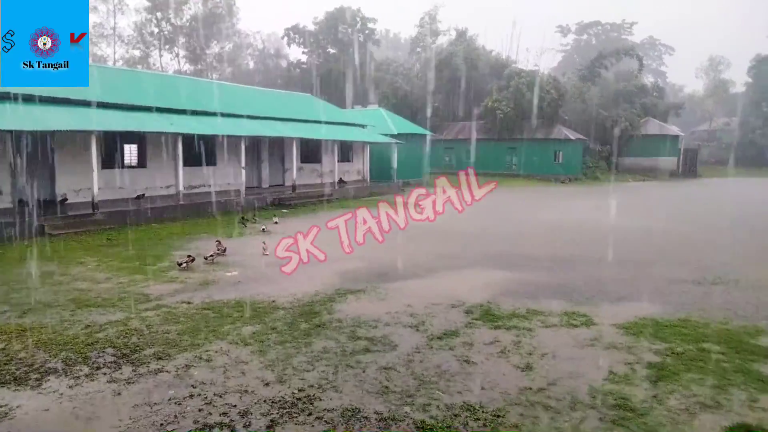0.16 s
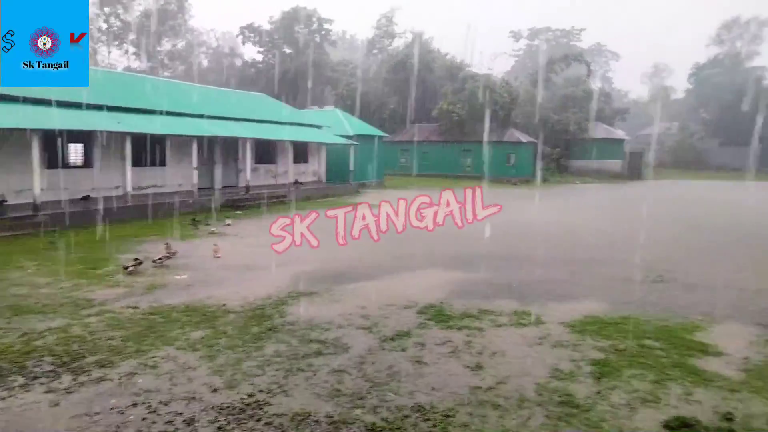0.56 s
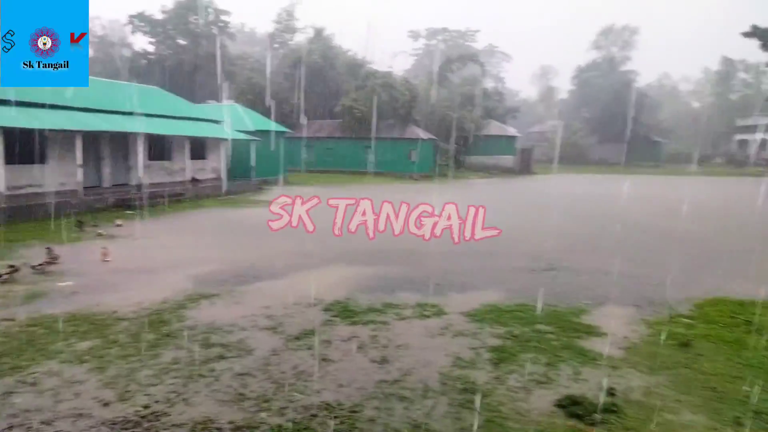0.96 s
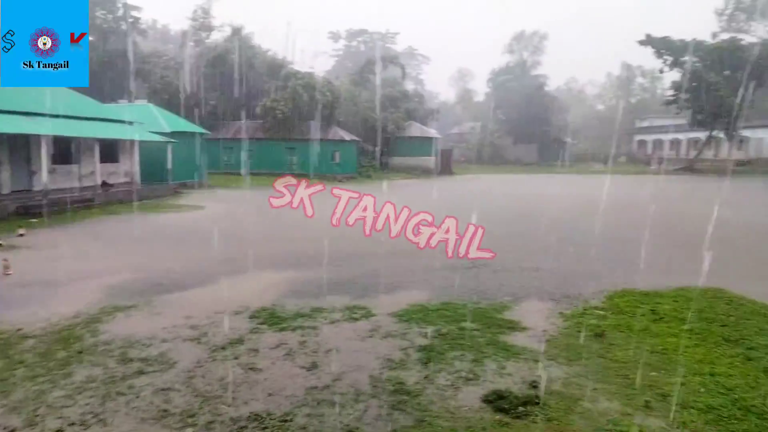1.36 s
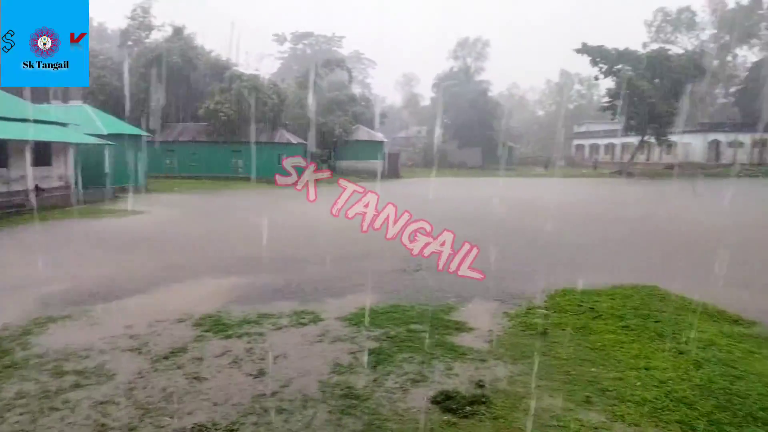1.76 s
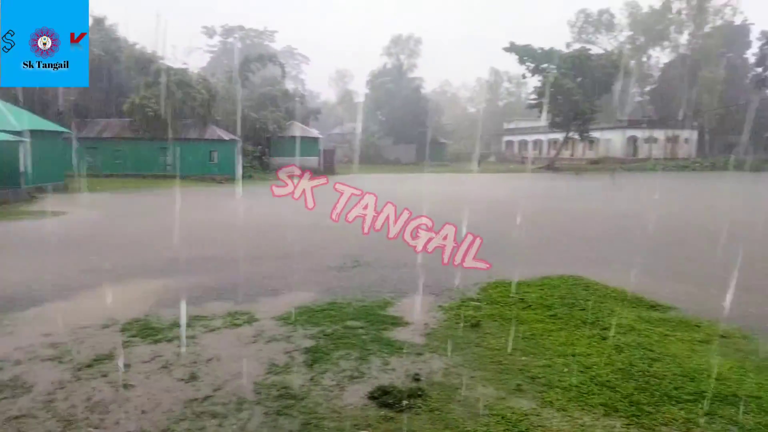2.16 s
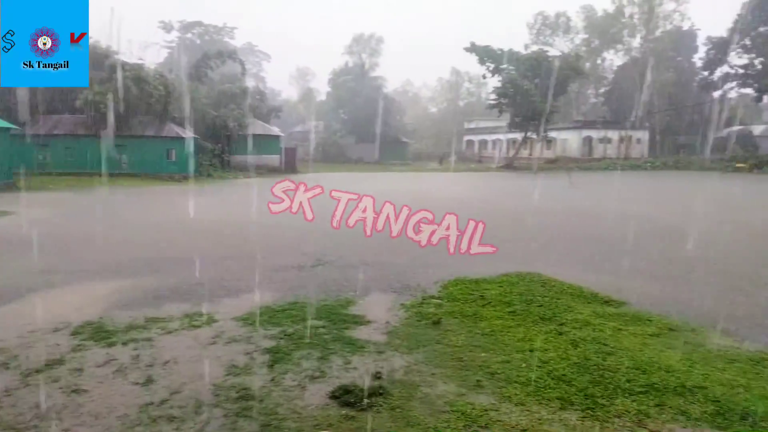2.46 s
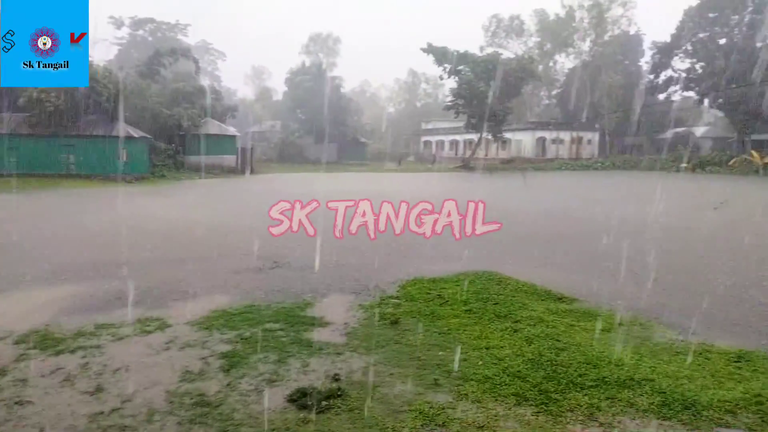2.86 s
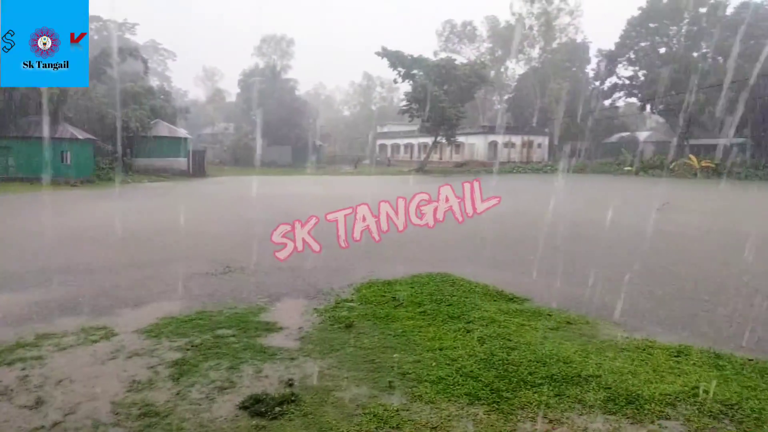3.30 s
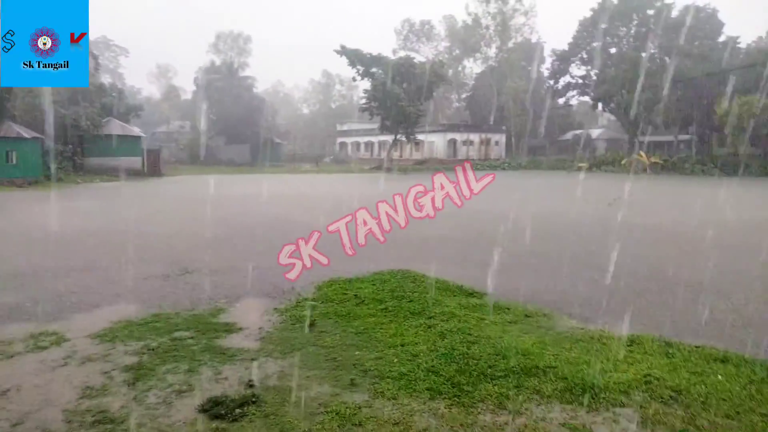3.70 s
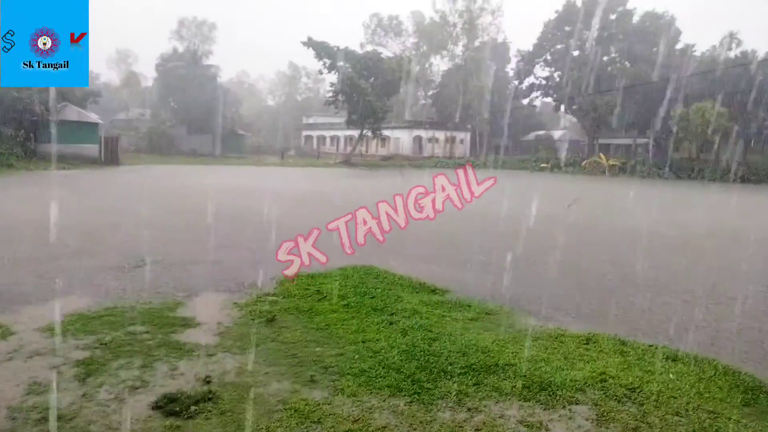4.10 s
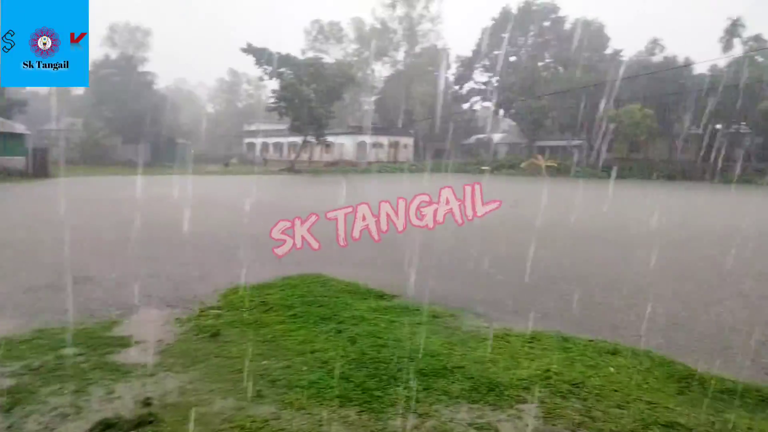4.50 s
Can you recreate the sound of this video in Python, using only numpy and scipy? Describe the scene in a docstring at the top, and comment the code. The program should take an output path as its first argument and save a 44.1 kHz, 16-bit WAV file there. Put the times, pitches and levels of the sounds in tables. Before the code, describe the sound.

Heavy, even rain pours onto a flooded field, a dense wash with bright sizzle, dipping briefly in level near the end.

```python
"""A dense, even downpour on a flooded field: a broad wash, a bright sizzle and a low drumming, the same in both channels.
Far drops merge into shaped noise; near drops are noise puffs and tiny ringing bubbles scattered at random.
Roofs and soaked ground drum below as low noise. Resonances of the microphone port, strongest near 9 kHz,
brighten the spray. Late on, the level dips briefly, then swings gently up and down."""
import sys
import numpy as np
from scipy import signal
from scipy.fft import rfft, irfft, next_fast_len
from scipy.io import wavfile
from scipy.ndimage import uniform_filter1d, map_coordinates

SR = 44100
rng = np.random.default_rng(int(sys.argv[2]) if len(sys.argv) > 2 else 0)


def store_wav(level_fs):
    """Save 16-bit WAV to argv[1]."""
    pcm = np.round(np.clip(np.atleast_2d(level_fs), -1, 1) * 32767)
    wavfile.write(sys.argv[1], SR, pcm.T.astype(np.int16))


N = 204753  # length in samples

# Strength of the rain, which drives every layer. Each row: time in seconds, strength in dB.
RAIN_STRENGTH = [(0.0, -21), (0.1, -19.5), (0.23, -21), (2.68, -21.5), (2.87, -20.5), (3.98, -20),
                 (4.03, -20.5)]
# Tone of the far rain and standing water. Each row: frequency in Hz, relative level in dB.
WASH_SPECTRUM = [(100, -36), (300, -11), (480, -6), (560, -0.8), (700, -2.1), (880, -0.65), (1400, -0.4),
                 (1750, -2.3), (2300, 0), (2850, 0), (3400, -4), (4800, -11.5), (8000, -22), (16000, -40)]
# Tone of the fine spray. Each row: frequency in Hz, relative level in dB.
SPRAY_SPECTRUM = [(1000, -18), (3000, -1.5), (4200, -1), (5800, -2), (8000, 0), (10000, 0), (12000, 0.1),
                  (15500, -0.96)]
# Tone of the roofs and ground. Each row: frequency in Hz, relative level in dB.
DRUMMING_SPECTRUM = [(20, -16), (45, -7), (72, -6), (90, 0.5), (125, -2.5), (195, -1), (240, -4), (330, -4),
                     (480, -10.5), (900, -27.5)]
# Resonances of the microphone port. Each row: centre in Hz, width in Hz, lift in dB (overlapping lifts add).
PORT_RESONANCES = [(6980, 1300, 4.5), (8730, 1880, 8.5), (9850, 2070, 4.5)]

USUAL_DB = -20.5  # strength of the even downpour
# Base level at the usual strength, and dB gained per dB of strength.
WASH_DB, WASH_GROWS = -25.5, 0.72
SPRAY_DB, SPRAY_GROWS = -22.5, 0.92  # swings wider, so harder rain is brighter
# The level slides down, holds, and snaps back.
DIP_START_S, DIP_END_S, DIP_DB = 4.128, 4.223, -7.9
DIP_FALL_S, DIP_RETURN_S = 0.01, 0.0018
# Then one swing, up and down: midpoint, time from there to each extreme, size of each extreme.
SWING_AT_S, SWING_WIDTH_S, SWING_DB = 4.368, 0.036, 1.3
TOP_HZ = 15750  # upper band limit


def flooded_field(wash_db):
    """Far drops merge into a wash; nearer ones plink and plop as bubbles and splashes in standing water."""
    far = rush(WASH_SPECTRUM, patchy_db=0.5)
    plinks = bubbles(count=4000, pitch_hz=2402, octaves=0.5, cycles=20, rise=0.044, spread_db=2.5)
    plinks = coloured(plinks, WASH_SPECTRUM)
    plops = coloured(splats(count=5000, life_s=0.00082, spread_db=1.5), WASH_SPECTRUM)
    water = amp(-2.5) * far + amp(-7.0) * plinks + amp(-8.0) * plops
    return amp(wash_db + 0.078 * wobble(12)) * water


def spray(spray_db):
    """Fine hiss off the whole surface, ticks on grass and mud close by, and the fizz of the tiniest bubbles."""
    hiss = rush(SPRAY_SPECTRUM, patchy_db=0.43)
    ticks = coloured(splats(count=9000, life_s=0.00059, spread_db=1.5), SPRAY_SPECTRUM)
    fizz = unit(bubbles(count=2500, pitch_hz=8946, octaves=0.12, cycles=52, rise=0.015, spread_db=2.5))
    sizzle = amp(-5.5) * hiss + amp(-9.0) * ticks + amp(-18.5) * fizz
    return amp(spray_db + 0.34 * wobble(16)) * sizzle


def bubbles(count, pitch_hz, octaves, cycles, rise, spread_db):
    """Trapped air rings, fading over a set number of cycles, and climbs in pitch as it nears the surface."""
    t = np.arange(SR // 40) / SR
    hz = pitch_hz * 2 ** (octaves * rng.standard_normal((count, 1)))
    hz = np.clip(hz, 500, 13000)
    age = hz * t / cycles  # 1 when the ring has faded to 1/e
    # the pitch climbs by the fraction "rise" as the ring ages
    phase = 2 * np.pi * cycles * (age + rise * (age - 1 + np.exp(-age)))
    return scatter(np.sin(phase) * np.exp(-age), spread_db)


def splats(count, life_s, spread_db):
    """Each drop bursts on the surface in a short, fading puff of noise."""
    t = np.arange(SR // 200) / SR
    puffs = rng.standard_normal((count, len(t))) * np.exp(-t / life_s)
    return scatter(puffs, spread_db)


def scatter(grains, spread_db):
    """Drop each row at a random moment; a few land close and loud, most are faint."""
    count, length = grains.shape
    nearness = np.minimum(rng.exponential(size=count), 5)
    starts = rng.integers(0, N, count)
    index = starts[:, None] + np.arange(length)
    levelled = grains * amp(spread_db * nearness)[:, None]
    return np.bincount(index.ravel(), levelled.ravel(), N)[:N]


def rush(spectrum, patchy_db):
    """Countless merged drops: noise whose gain varies in smooth random patches of time and frequency."""
    bins = signal.stft(rng.standard_normal(N), nperseg=512)[2]
    patches = uniform_filter1d(rng.standard_normal(bins.shape), size=9, axis=0)  # across frequency
    patches = uniform_filter1d(patches, size=16, axis=1)  # across time
    noise = signal.istft(bins * amp(patchy_db * unit(patches)), nperseg=512)[1][:N]
    return coloured(noise, spectrum)


def drumming(wash_db):
    """Roofs and soaked ground give a low roll of noise that follows the wash."""
    return amp(wash_db - 16.5) * rush(DRUMMING_SPECTRUM, patchy_db=1)


def amp(db):
    """Decibels to gain."""
    return 10 ** (np.asarray(db) / 20)


def unit(x):
    """Scale to rms 1."""
    return x / np.sqrt(np.mean(x ** 2) + 1e-20)


def curves(rows):
    """One value per sample for each column after the time."""
    seconds, *columns = np.transpose(rows)
    return [np.interp(np.arange(N) / SR, seconds, column) for column in columns]


def wobble(rate):
    """A smooth random curve, rate knots a second."""
    knots = rng.standard_normal(int(N * rate / SR) + 4)
    return map_coordinates(knots, [np.arange(N) * rate / SR])


def filtered(x, response):
    """Shape x with a gain for each frequency, padded so the tail does not wrap round."""
    size = next_fast_len(N + SR // 2)
    hz = np.fft.rfftfreq(size, 1 / SR)
    return irfft(rfft(x, size) * response(hz), size)[:N]


def coloured(x, spectrum):
    """Give x a tone drawn in dB over a log frequency axis, at rms 1."""
    points_hz, db = np.transpose(spectrum)

    def response(hz):
        return amp(np.interp(np.log(hz + 1), np.log(points_hz), db))

    return unit(filtered(x, response))


def dip():
    """Gain in dB: a short flat dip, then one smooth swing over and under the usual level."""
    t = np.arange(N) / SR
    fall = (t - DIP_START_S) / DIP_FALL_S
    snap_back = (DIP_END_S - t) / DIP_RETURN_S
    depth = np.clip(np.minimum(fall, snap_back), 0, 1)
    u = (t - SWING_AT_S) / SWING_WIDTH_S
    swing = -u * np.exp((1 - u * u) / 2)  # extremes of +1 and -1
    return DIP_DB * depth + SWING_DB * swing


def port(hz):
    """Resonances of the microphone port lift the sizzle; nothing passes above the band limit."""
    lift_db = sum(db / (1 + (2 * (hz - centre) / width) ** 2) for centre, width, db in PORT_RESONANCES)
    return amp(lift_db) * (hz < TOP_HZ)


def scene():
    """All layers follow the strength of the rain; both channels carry the same sound."""
    strength_db, = curves(RAIN_STRENGTH)
    surge_db = strength_db - USUAL_DB
    wash_db = WASH_DB + WASH_GROWS * surge_db
    spray_db = SPRAY_DB + SPRAY_GROWS * surge_db
    rain = flooded_field(wash_db) + spray(spray_db) + drumming(wash_db)
    return np.array([rain, rain])


def record(dry):
    """The level dips and swings, then the microphone port colours each channel."""
    gain = amp(dip())
    return np.array([filtered(side * gain, port) for side in dry])


dry = scene()
out = record(dry)
store_wav(out)
```